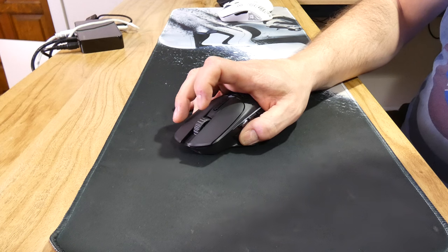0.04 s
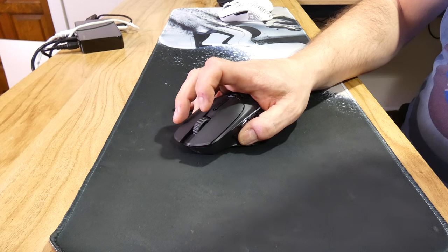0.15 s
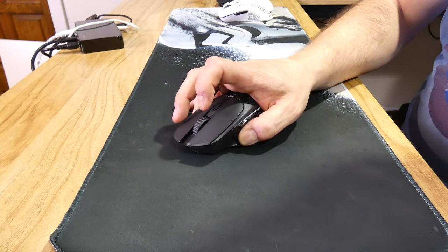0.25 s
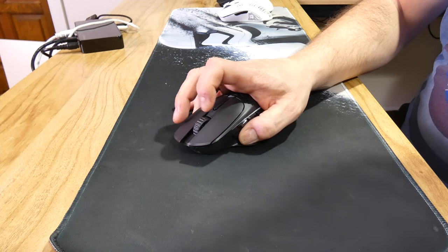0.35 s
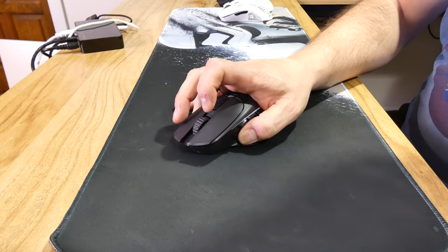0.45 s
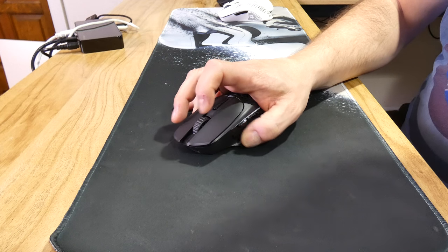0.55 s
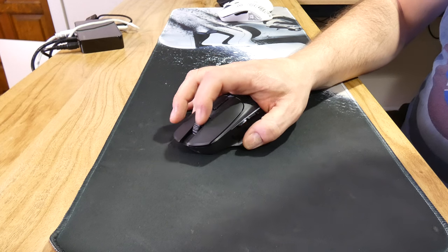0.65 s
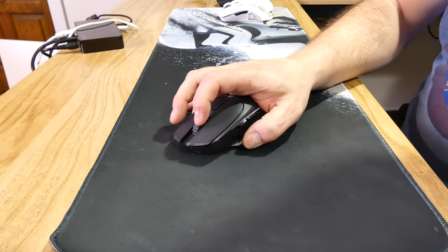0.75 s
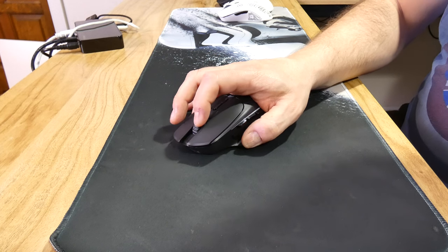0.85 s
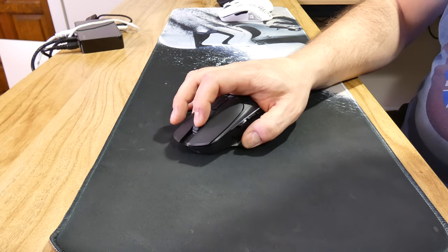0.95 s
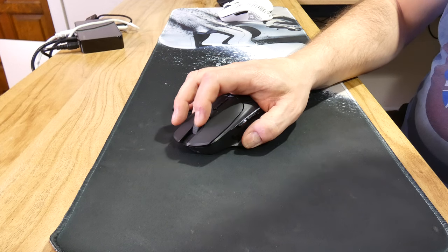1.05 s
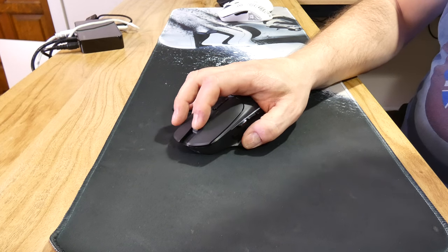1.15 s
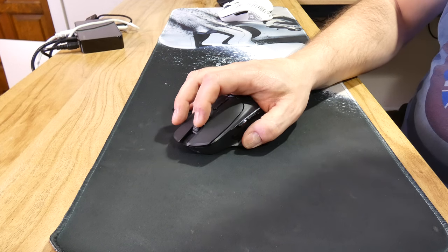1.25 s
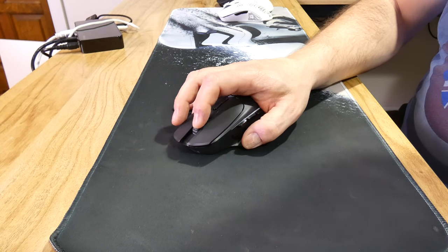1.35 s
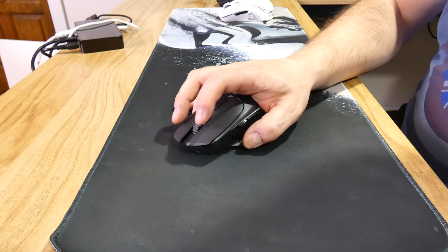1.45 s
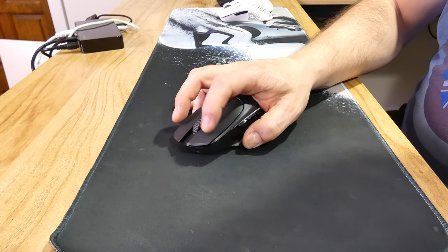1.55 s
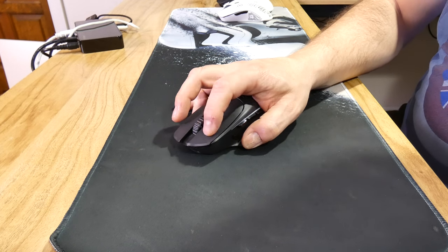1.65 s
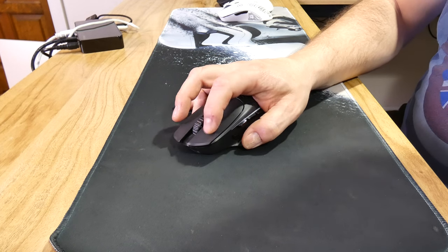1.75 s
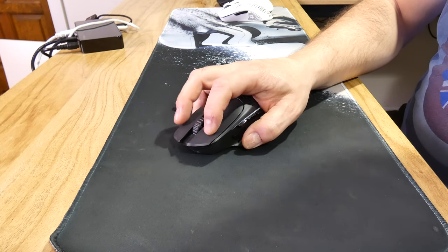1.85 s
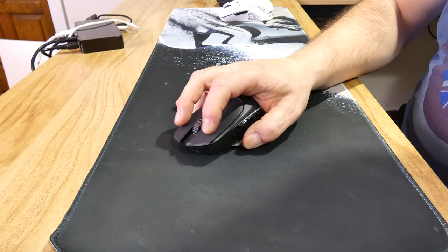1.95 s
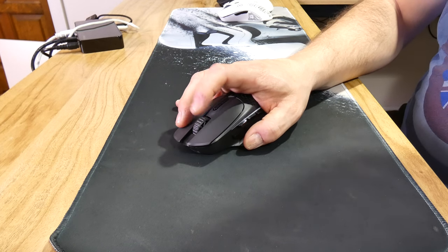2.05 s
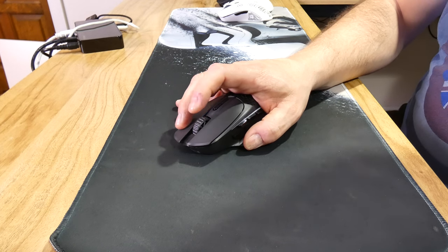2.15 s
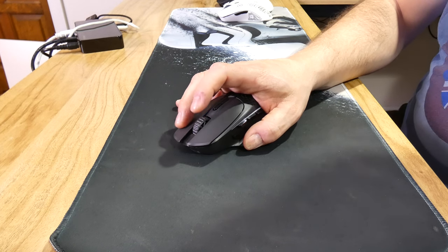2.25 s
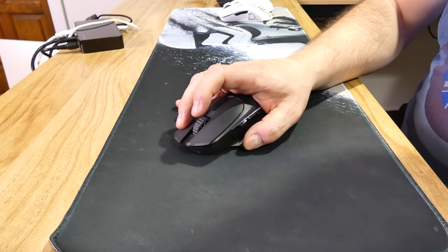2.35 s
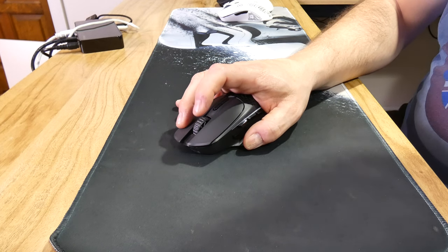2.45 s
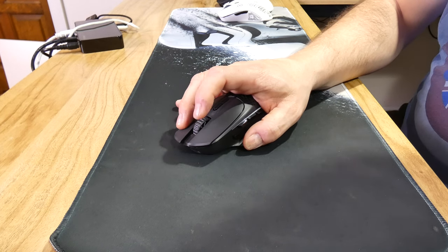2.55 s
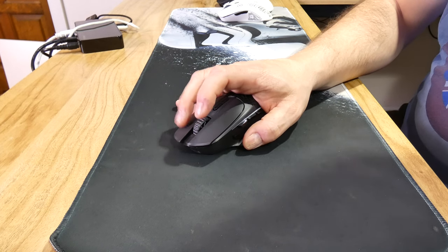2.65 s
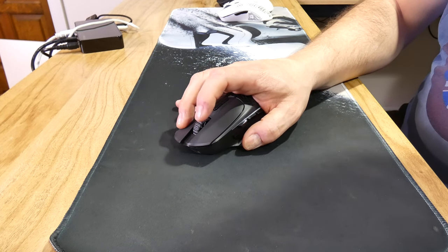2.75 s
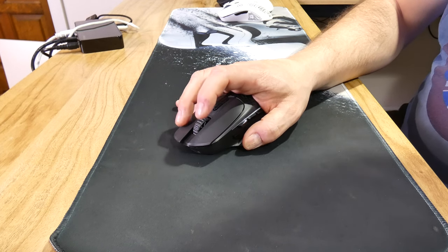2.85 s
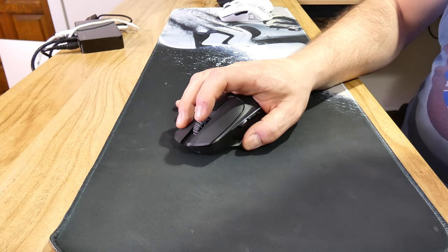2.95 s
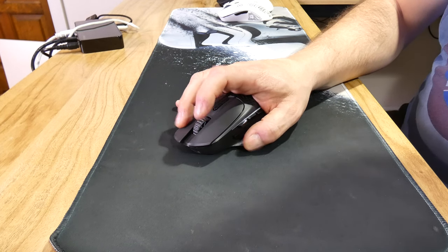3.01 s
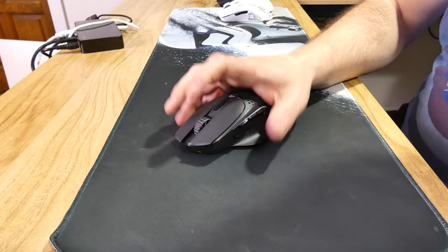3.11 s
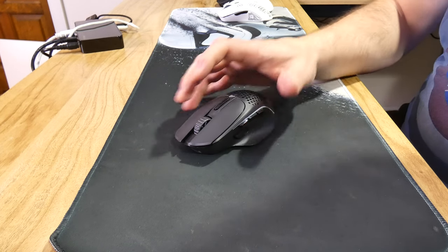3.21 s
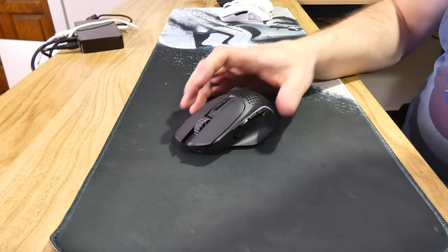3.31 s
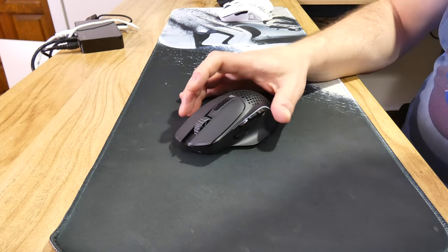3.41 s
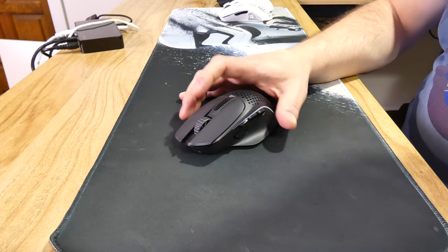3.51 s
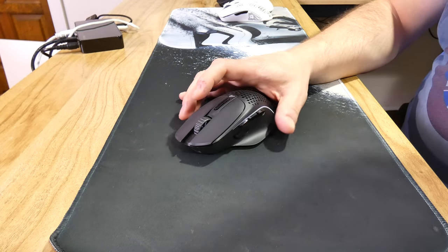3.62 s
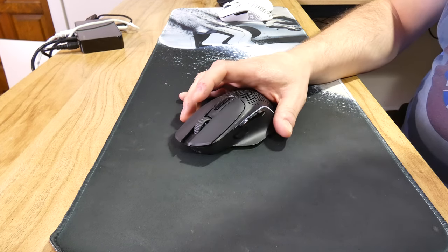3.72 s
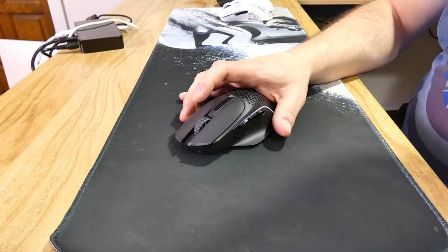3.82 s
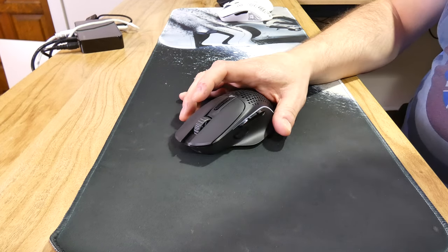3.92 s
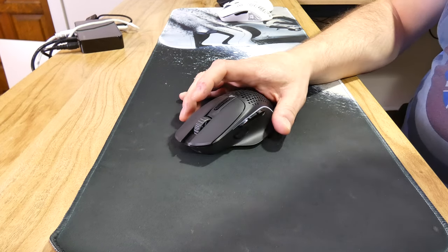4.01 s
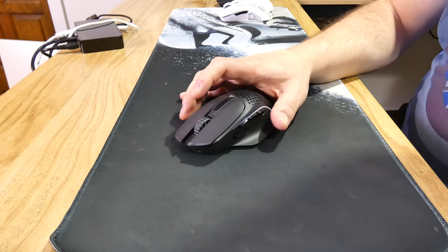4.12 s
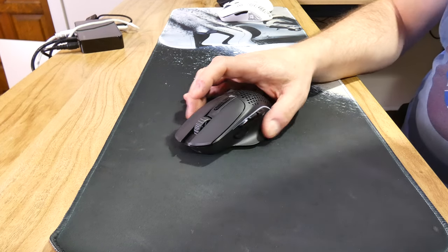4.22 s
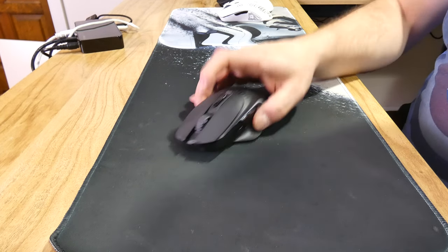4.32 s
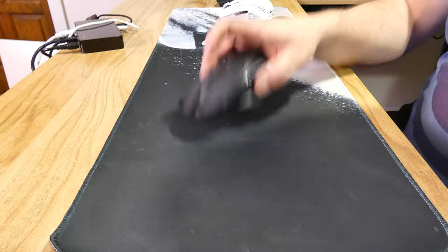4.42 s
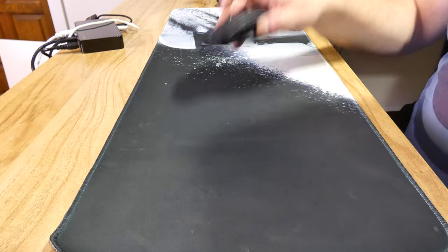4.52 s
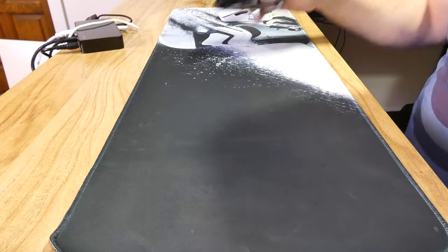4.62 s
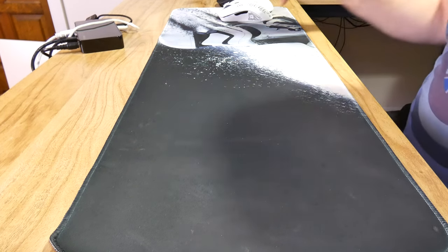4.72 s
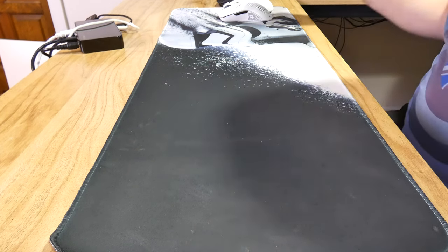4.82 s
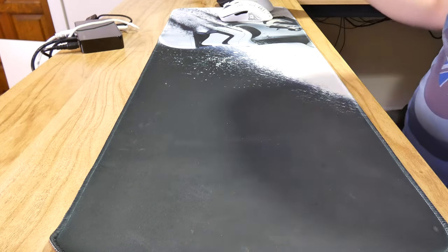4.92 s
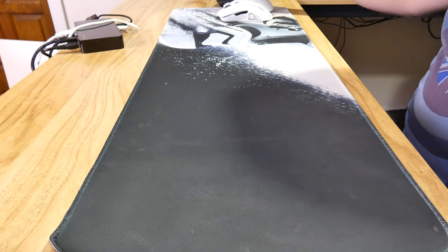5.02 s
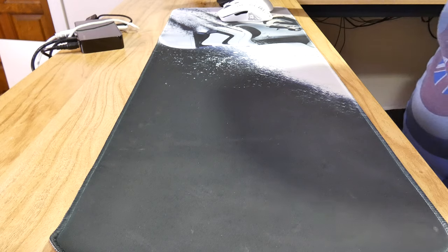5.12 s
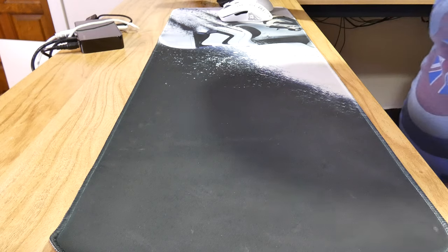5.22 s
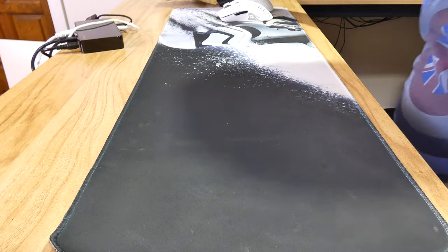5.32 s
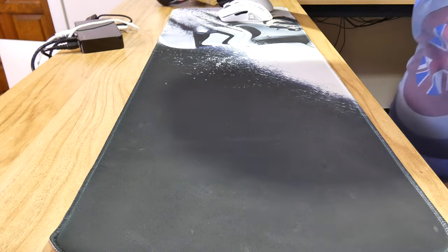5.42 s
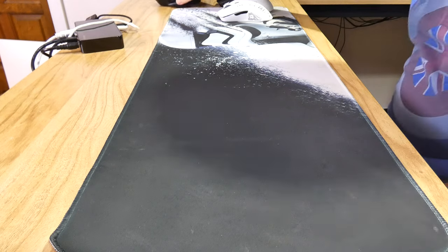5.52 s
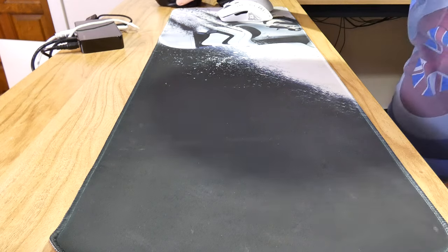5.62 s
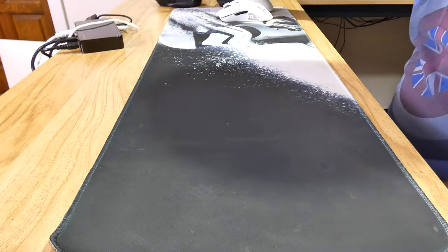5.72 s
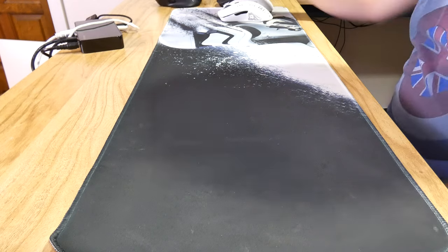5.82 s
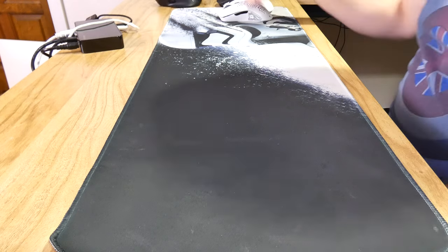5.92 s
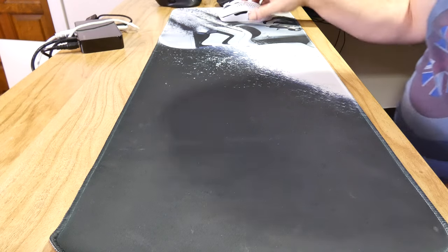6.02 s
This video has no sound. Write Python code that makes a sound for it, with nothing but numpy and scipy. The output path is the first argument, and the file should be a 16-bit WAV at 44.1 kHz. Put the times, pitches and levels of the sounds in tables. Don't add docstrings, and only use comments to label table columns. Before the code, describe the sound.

A small quiet room with a low, soft hum of air, heard close in stereo with short reflections. From 0.06 to 0.56 s, five light thumb-button snaps come about an eighth of a second apart, with slight skin rub. After a pause, four tight wheel clicks run from 1.14 to 1.48 s. Sharper left-button presses and releases follow from 1.69 to 2.2 s, then bright right-button clicks at a quick, steady pace from 2.3 to 3.1 s, the last release strongest, with tiny plastic knocks beneath. Around 3.2-3.5 s there is faint rubbing, then near quiet. At 4.25-4.7 s skin and cloth brush the pad with soft hand thumps. A dull scrape at 4.76 s and a rattling skid near 5.1 s accompany faint sleeve swishes. Two hard, loud wooden knocks with plastic rattle strike at 5.49 and 5.64 s, the second slightly weaker. Small plastic ticks and a soft hand touch end near 6 s.

```python
import sys
import numpy as np
from scipy import signal
from scipy.fft import rfft, irfft
from scipy.io import wavfile
from scipy.ndimage import uniform_filter1d

SR = 44100
rng = np.random.default_rng(int(sys.argv[2]) if len(sys.argv) > 2 else 0)


def inscribe(sig):
    pcm = np.round(np.clip(np.atleast_2d(sig).T, -1, 1) * 32767)
    wavfile.write(sys.argv[1], SR, pcm.astype(np.int16))


def gain_from_db(level_db):
    decades = np.asarray(level_db, float) / 20
    return 10 ** decades


N = 267245

# (frequency [Hz], density [dB per Hz])
AIR_MID_SPECTRUM = [(12, -70), (20, -46.5), (69, -11.5), (123, -10.5), (145, -5.5), (232, -8.5),
                    (361, -15.5), (577, -15), (662, -15.5), (781, -22.5), (1180, -17.5), (1320, -23.5),
                    (2930, -26.0), (14000, -34), (15300, -70)]
AIR_SIDE_SPECTRUM = [(12, -56), (20, -28.5), (65, -18), (156, -8), (189, -11.5), (270, -6.5), (346, -13.0),
                     (522, -13.5), (745, -10.5), (1360, -23), (1740, -24.5), (11600, -43.0), (14000, -48.5),
                     (15000, -61.0)]
HUM_SPECTRUM = [(250, -58), (320, 5.0), (360, 12.5), (410, -3.0), (520, -31.5)]
# (peak [s], rise [s], fall [s], level [dB])
HUM_SWELLS = [
    (1.0, .6, 2.1, -59),
    (2.6, 1, 0.55, -63.5),
    (3.55, 0.59, 0.51, -58),
    (4.35, 0.76, 0.76, -59.5),
    (5.36, 0.2, .3, -58.5),
    (6.05, 0.3, .5, -59.5),
]
# (delay [s], level [dB])
WALL_ECHOES = [(.0019, -13), (.0055, -9), (.0085, -16), (.0115, -15)]
# (frequency [Hz], t60 [s])
ROOM_T60 = [(250, 0.42), (700, .22), (1800, 0.2), (4500, 0.17), (10000, 0.15)]

# (peak [s], rise [s], fall [s], hiss [dB], body re hiss [dB])
RUB_STROKES = [(0.414, 0.043, 0.0077, -59, -12), (0.634, 0.042, .045, -62, -9),
               (3.225, 0.12, 0.077, -62, -8.5), (3.33, 0.072, 0.066, -65, 0), (3.44, 0.13, .12, -58.5, -11),
               (4.25, 0.077, 0.25, -62.5, -14), (4.375, 0.095, 0.067, -53.5, -7.5),
               (4.454, 0.048, 0.036, -57.5, 0.5), (4.562, 0.039, 0.047, -68, -1),
               (4.72, 0.086, 0.047, -66, -18), (6.022, 0.023, 0.035, -57.5, -15)]
# (peak [s], rise [s], fall [s], level [dB])
SLEEVE_STROKES = [
    (2.17, .1, 0.049, -70),
    (5.08, 0.16, 0.1, -64.5),
    (5.2, 0.094, 0.13, -68),
    (5.37, 0.22, 0.15, -65),
]
# (frequency [Hz], density [dB per Hz])
HISS_SPECTRUM = [(1470, -7), (2500, -4.5), (3160, 0), (4690, 0), (5150, 4.5), (7710, -2), (9890, 0),
                 (14600, -12.5), (16000, -24)]
BODY_SPECTRUM = [(200, -33), (500, 16.5), (1000, 14), (2500, 5), (4000, -57)]
SWISH_SPECTRUM = [(2000, -35), (4500, -13), (5800, -11), (6450, 1), (7200, -6.5), (9000, -8), (11000, -6),
                  (12500, -14.5), (15000, -30.5)]

# (time [s], level [dB], low modes [dB], treble [dB], rattle [dB])
BLOW_EVENTS = [
    (5.491, -5, -6, -13.5, -7),
    (5.643, -8, -4, -13, -11),
]
SKID_EVENTS = [
    (4.761, -46.5, 26, -27, 6.3),
    (5.021, -41.5, -6, -36, 2.9),
    (5.098, -23.5, -21.5, -13, 11.45),
]
# (time [s], thump [dB], slap re thump [dB])
HEEL_THUMPS = [
    (4.305, -52, -20),
    (4.447, -48, -9.5),
    (5.521, -41.5, -27.5),
    (5.655, -38.5, -27),
    (6.003, -49.5, -18),
]
# (time [s], level [dB], frequency [Hz])
PLASTIC_TICKS = [
    (4.55, -69, 5500),
    (4.5644, -73, 5560),
    (5.6149, -44, 2960),
    (5.7574, -59, 6100),
    (5.998, -64, 3490),
    (6.0215, -53.5, 3440),
]
# (frequency [Hz], width [Hz], level [dB])
DESK_LOW_MODES = [(224, 30, -6), (267.5, 12.1, 1), (331, 66, -0.5), (396, 26, -6.5), (475, 90, -12.5),
                  (532, 190, 5), (619, 39, -15.5)]
DESK_MID_MODES = [(798, 82, 4.5), (1034, 170, -1.5), (1190, 113, 3.5), (1490, 470, -4), (1884, 140, -1.5),
                  (2160, 400, -4), (2640, 380, -2)]
DESK_HIGH_MODES = [(3470, 820, 2.5), (4860, 2000, -3.5), (6500, 1300, -9), (9270, 2270, -8)]
SHELF_MID_MODES = [(550, 250, -6), (850, 250, -3), (1150, 300, 0), (1450, 300, -2), (2100, 600, -7),
                   (2800, 700, -10)]
SHELF_HIGH_MODES = [(3600, 900, 0), (5000, 1000, -2), (6600, 1000, -3), (8500, 2000, -12),
                    (10500, 2000, -19)]
HEEL_MODES = [(157, 81, 4), (201, 51, 0.5), (310, 47, -7.5)]

# (time [s], snap [dB], shell knock re snap [dB], desk thud re snap [dB])
THUMB_DOWN_SNAPS = [
    (0.0626, -33, -39, -47),
    (0.3229, -30.5, -24, -48),
    (0.5602, -32, -38, -34),
]
THUMB_UP_SNAPS = [
    (0.1993, -32, -27, -58),
    (0.4314, -31.5, -23.5, -37.5),
]
WHEEL_SNAPS = [
    (1.1372, -30.5, -21, -21.5),
    (1.2518, -31, -29.5, -27.5),
    (1.3542, -30.5, -19, -25),
    (1.4779, -28, -21, -28),
]
LEFT_DOWN_SNAPS = [
    (1.8179, -26, -15, -30.5),
    (2.0326, -23.5, -14.5, -38),
]
LEFT_UP_SNAPS = [
    (1.6869, -27.5, -18.5, -31.5),
    (1.8763, -27.5, -19.5, -35.5),
    (2.1953, -29.5, -20.5, -27.5),
]
RIGHT_DOWN_SNAPS = [
    (2.3021, -25, -20, -30),
    (2.491, -27, -20.5, -33.5),
    (2.6717, -27, -18, -31.5),
    (2.8846, -24.5, -17.5, -30),
]
RIGHT_UP_SNAPS = [
    (2.379, -29, -20.5, -33),
    (2.5573, -28.5, -22.5, -29.5),
    (2.7471, -25, -20, -43),
    (2.9629, -29.5, -19, -27),
    (3.1064, -23, -13.5, -29),
]
# (time [s], knock [dB], thud re knock [dB], rattle re knock [dB])
PLATE_STOPS = [(0.356, -54.5, -0.5, 2), (0.409, -58, -30, 7), (0.608, -60, -3, 6), (0.747, -61.5, -3, -15),
               (1.661, -61.5, 3, 9), (1.713, -45.5, -5, -3), (2.162, -53.5, -32, 3), (2.407, -54, -44, -12),
               (2.767, -40.5, -16, -7), (2.981, -45, -46, -8), (4.246, -70, 8.5, -9), (5.959, -60.5, 4, 0)]
FINGER_TOUCHES = [
    (1.812, -54.5, -5, 4),
    (2.021, -56, -4, -12),
    (2.743, -59, 3, -11),
    (2.869, -70, -13, 5),
    (2.96, -53, -6, -17),
    (5.481, -51, -18, 9),
    (5.09, -45.5, -16, 5),
]
# (frequency [Hz], width [Hz], level [dB])
THUMB_DOWN_RING = [(4560, 2600, -15), (6730, 520, -4), (8800, 810, -17), (9800, 470, -9.5),
                   (13400, 1040, -14)]
THUMB_UP_RING = [(4030, 1400, -6), (5650, 320, -4), (6920, 390, -4.5), (9450, 1200, -20),
                 (12300, 950, -14.5), (14500, 900, -13)]
WHEEL_RING = [(2100, 350, -6), (3400, 600, -9), (4780, 600, -1), (5800, 700, -6), (8200, 700, -9),
              (9900, 900, -12), (12000, 1500, -17), (14800, 800, -10)]
LEFT_DOWN_RING = [(2300, 600, -18), (4100, 1000, -5), (6000, 700, 0), (7800, 1000, -9), (10300, 900, 0),
                  (12000, 900, -13), (13900, 900, -15)]
LEFT_UP_RING = [(2910, 890, -13), (4630, 2700, -10.5), (6360, 1500, -7.5), (6730, 470, -3.5),
                (8000, 540, -1.5), (10400, 2100, -11), (14200, 400, -22)]
RIGHT_DOWN_RING = [(2040, 230, -10), (2990, 130, 2), (3840, 1100, -5), (5480, 490, -1), (6580, 530, 3),
                   (8800, 990, 1.5), (10600, 480, 0.5), (13200, 240, -15.5), (13100, 780, -7.5)]
RIGHT_UP_RING = [(1996, 116, -8), (3110, 680, -7), (4530, 700, -2), (5700, 410, -7), (6560, 1300, -8),
                 (8780, 1800, -3), (11130, 480, -8), (13870, 240, -14), (13500, 730, -29)]
THUMB_PLATE_MODES = [(1150, 250, -13), (1745, 110, -2), (2250, 250, -12), (2730, 170, 1), (3480, 260, -6)]
SHELL_MODES = [(1049, 80, 4), (1190, 40, -3.5), (810, 240, -8.5)]
PAD_MODES = [(165, 62, -10), (216.8, 26, -0.5), (286, 24, -3), (334, 100, -7.5)]

AIR_DB, AIR_SIDE_DB = -69, 4.5
STROKE_DB = -22
STROKE_BEND, SWELL_BEND = 1.53, 1.87
ROCK_S, SKID_S = 0.027, 0.022
ROCK_LEAN, SKID_LEAN = 0.58, 0.16
SNAP_CONTACT_S, SNAP_SKIRT = 0.0012, 1.31
HAND_TURNS_PER_S = 1.7


def evened(x):
    return x / np.sqrt(np.mean(x ** 2) + 1e-20)


def read(points, hz):
    point_hz, value = np.transpose(points)
    return np.interp(np.log(hz + 1), np.log(point_hz + 1), value)


def add(mix, time_s, sound):
    part = mix[round(time_s * SR):][:len(sound)]
    part += sound[:len(part)]


def louder(modes, gain_db):
    return [(hz, width_hz, db + gain_db) for hz, width_hz, db in modes]


def high_pass(x, order, cutoff_hz):
    return signal.sosfilt(signal.butter(order, cutoff_hz, "high", fs=SR, output="sos"), x)


def envelope(strokes, bend, column):
    t, power = np.arange(N) / SR, np.zeros(N)
    for peak_s, rise_s, fall_s, *levels_db in strokes:
        u = np.where(t < peak_s, (peak_s - t) / rise_s, (t - peak_s) / fall_s)
        db = sum(levels_db[:column]) + STROKE_DB * u ** bend
        power += gain_from_db(2 * np.maximum(db, -200))
    return np.sqrt(power)


def noise(points, patchy_db=4.5):
    hz = np.fft.rfftfreq(1024, 1 / SR)
    real, imag, patches = rng.standard_normal((N // 256 + 5, 513, 3)).T
    patches = uniform_filter1d(patches, 8, 0)
    patches = evened(uniform_filter1d(patches, 12, 1))
    z = (real + 1j * imag) * gain_from_db(read(points, hz)[:, None] + patchy_db * patches)
    return evened(signal.istft(z, nperseg=1024, noverlap=768)[1][:N])


def ring(modes, contact_s, spread_db=1.5, skirt=1.226):
    size = 8192
    hz = np.fft.rfftfreq(size, 1 / SR) + 1
    power = np.zeros(len(hz))
    for (mode_hz, width_hz, db), luck in zip(modes, rng.standard_normal(len(modes))):
        detune = (hz - mode_hz * mode_hz / hz) / width_hz
        power += gain_from_db(2 * (db + spread_db * luck)) / (1 + detune ** 2) ** skirt
    cepstrum = irfft(0.5 * np.log(power + 1e-12))
    cepstrum[1:size // 2] *= 2
    cepstrum[size // 2 + 1:] = 0
    late_s = contact_s * abs(evened(uniform_filter1d(rng.standard_normal(len(hz)), 90)))
    phase = 2 * np.pi * np.cumsum(late_s) * SR / size
    out = irfft(np.exp(rfft(cepstrum) - 1j * phase))[:6000]
    return out / abs(out).max()


def air():
    mid = noise(AIR_MID_SPECTRUM, 0.2)
    side = gain_from_db(AIR_SIDE_DB) * noise(AIR_SIDE_SPECTRUM, 0.36)
    ports = np.array([noise(HUM_SPECTRUM, 3.5), noise(HUM_SPECTRUM, 3.5)])
    hum = gain_from_db(-5.5) * envelope(HUM_SWELLS, SWELL_BEND, column=1) * ports
    return gain_from_db(AIR_DB + 1) * np.array([mid + side, mid - side]) + hum


def echoes(tail_db, unlike, bend):
    taps = np.zeros((2, SR // 2))
    at = np.arange(100, SR // 2 - 20, 20) + rng.integers(0, 20, (2, (SR // 2 - 101) // 20))
    np.put_along_axis(taps, at, rng.choice([-1., 1.], at.shape), 1)
    hz, t, z = signal.stft(taps, SR, nperseg=256)
    decay_db = -60 * (t / read(ROOM_T60, hz)[:, None]) ** bend
    tail = signal.istft(z * gain_from_db(decay_db), SR, nperseg=256)[1]
    mid, side = gain_from_db(tail_db) * tail / np.linalg.norm(tail[0])
    for delay_s, db in WALL_ECHOES:
        scatter = rng.standard_normal(60) * np.exp(-np.arange(60) / 30)
        add(mid, delay_s, gain_from_db(db) * scatter / np.linalg.norm(scatter))
    return np.array([mid + unlike * side, mid - unlike * side])


def room(x, tail_db=-4, unlike=0.47, bend=0.76):
    out = thin = high_pass(x, 3, 130)
    turn = 2 * np.pi * HAND_TURNS_PER_S * np.arange(N) / SR
    for share in (np.cos(turn), np.sin(turn)):
        heard = signal.fftconvolve((share * thin)[None], echoes(tail_db, unlike, bend), axes=1)
        out = out + heard[:, :N]
    return out


def rubs():
    grain = gain_from_db(evened(uniform_filter1d(rng.standard_normal(N), 150)))
    body = noise(BODY_SPECTRUM, patchy_db=3.0)
    hiss = noise(HISS_SPECTRUM, patchy_db=1.2)
    swish = noise(SWISH_SPECTRUM, patchy_db=1.2)
    skin = envelope(RUB_STROKES, STROKE_BEND, column=1) * hiss
    skin += envelope(RUB_STROKES, STROKE_BEND, column=2) * body
    sleeve = envelope(SLEEVE_STROKES, STROKE_BEND, column=1) * swish
    return grain * (skin + sleeve)


def dull(x):
    low = signal.sosfilt(signal.butter(2, 10500, "low", fs=SR, output="sos"), x)
    return high_pass(low, 4, 235)


def rattle(rattle_s, lean, rattle_db):
    u = np.arange(5000) / SR / rattle_s
    contacts = rng.standard_normal(5000) * (rng.random(5000) < 0.08) * u ** lean * np.exp(-u ** 2)
    contacts *= gain_from_db(rattle_db) / np.linalg.norm(contacts)
    contacts[0] = 1
    return contacts


def blows():
    out = np.zeros(N)
    kinds = [(BLOW_EVENTS, DESK_MID_MODES, DESK_HIGH_MODES, ROCK_S, ROCK_LEAN),
             (SKID_EVENTS, SHELF_MID_MODES, SHELF_HIGH_MODES, SKID_S, SKID_LEAN)]
    for events, middle, high, rattle_s, lean in kinds:
        for time_s, db, low_db, high_db, rattle_db in events:
            modes = louder(DESK_LOW_MODES, low_db + 8.0) + middle + louder(high, high_db)
            strike = ring(modes, 0.00073, skirt=1.46)
            contacts = rattle(rattle_s, lean, rattle_db)
            add(out, time_s, gain_from_db(db + 1.5) * signal.fftconvolve(strike, contacts))
    out = dull(out)
    for time_s, db, slap_db in HEEL_THUMPS:
        add(out, time_s, gain_from_db(db + 5.5) * ring(HEEL_MODES + louder(SHELF_MID_MODES, slap_db - 7), 0.00206))
    for time_s, db, hz in PLASTIC_TICKS:
        modes = [(hz, 900, 0), (1.4 * hz, 1800, -6), (0.46 * hz, 600, -8)]
        add(out, time_s, gain_from_db(db + 15) * ring(modes, 0.00117))
    return out


def buttons():
    out = np.zeros(N)
    kinds = [(THUMB_DOWN_SNAPS, THUMB_PLATE_MODES + THUMB_DOWN_RING),
             (THUMB_UP_SNAPS, THUMB_PLATE_MODES + THUMB_UP_RING),
             (WHEEL_SNAPS, WHEEL_RING),
             (LEFT_DOWN_SNAPS, LEFT_DOWN_RING), (LEFT_UP_SNAPS, LEFT_UP_RING),
             (RIGHT_DOWN_SNAPS, RIGHT_DOWN_RING), (RIGHT_UP_SNAPS, RIGHT_UP_RING)]
    for snaps, modes in kinds:
        for time_s, db, knock_db, thud_db in snaps:
            snap = ring(modes, SNAP_CONTACT_S, spread_db=2.0, skirt=SNAP_SKIRT)
            add(out, time_s, gain_from_db(db + 4) * snap)
            add(out, time_s, gain_from_db(db + knock_db + 5.0) * ring(SHELL_MODES, 0.0001))
            add(out, time_s, gain_from_db(db + thud_db + 10.5) * ring(PAD_MODES, 0.0017, skirt=1.37))
    for time_s, db, thud_db, rattle_db in PLATE_STOPS + FINGER_TOUCHES:
        add(out, time_s, gain_from_db(db + 3.0) * ring(SHELL_MODES, 0.00021))
        add(out, time_s, gain_from_db(db + thud_db + 2.5) * ring(PAD_MODES, 0.00166))
        add(out, time_s, gain_from_db(db + rattle_db + 0.5) * ring(THUMB_PLATE_MODES[1:], 0.00099))
    return out


def scene():
    near = room(buttons() + gain_from_db(-3.0) * rubs())
    far = room(blows(), tail_db=-3.0, unlike=0.43, bend=0.98)
    return near + far + air()


def band_limit(x):
    return signal.sosfilt(signal.butter(12, 16820, fs=SR, output="sos"), x)


def record(dry):
    edge = signal.firwin(255, 16300, window=("kaiser", 9), fs=SR)
    mix = signal.oaconvolve(dry, edge[None], "same")
    return band_limit(mix)


dry = scene()
out = record(dry)
inscribe(out)
```